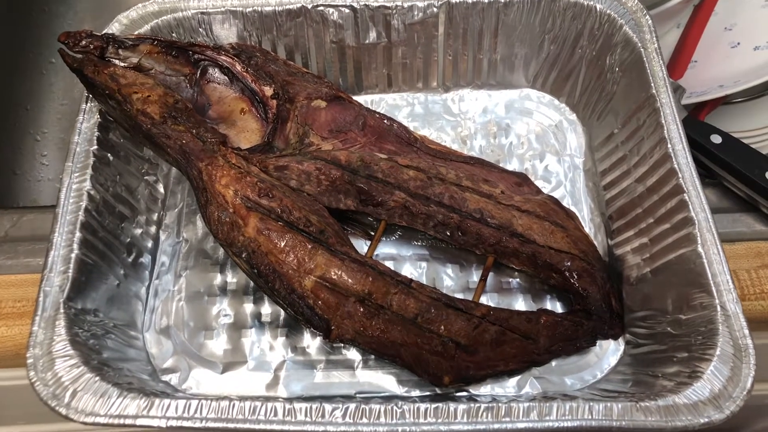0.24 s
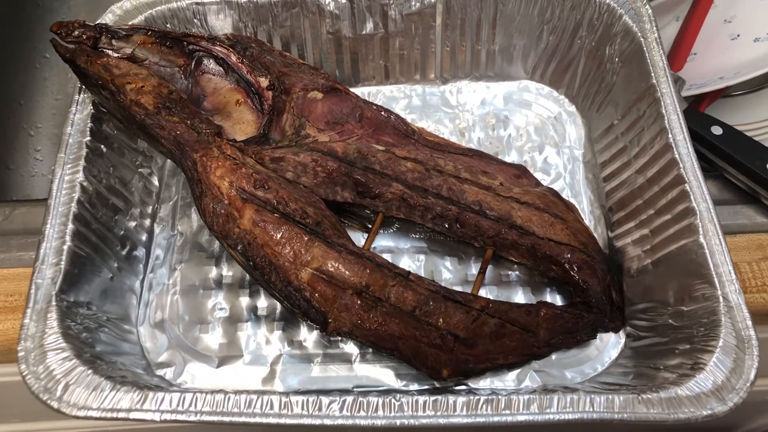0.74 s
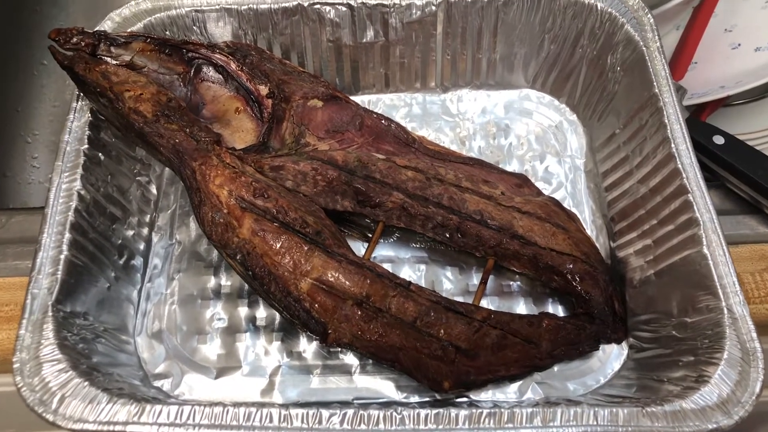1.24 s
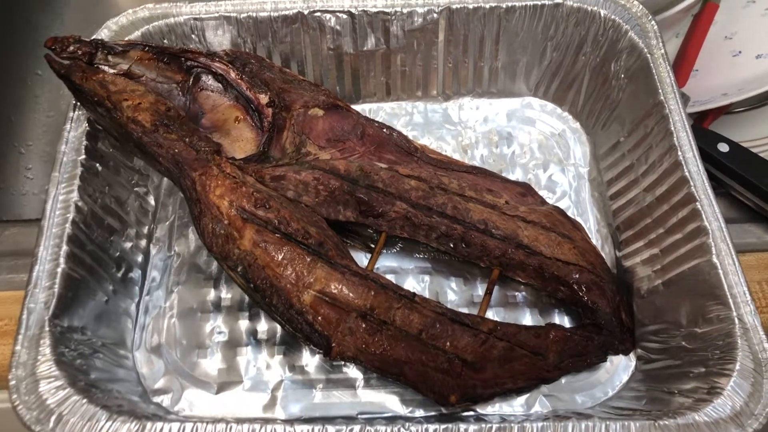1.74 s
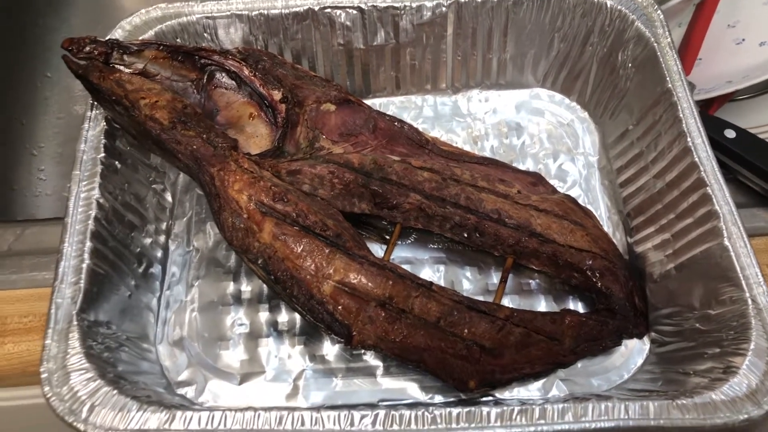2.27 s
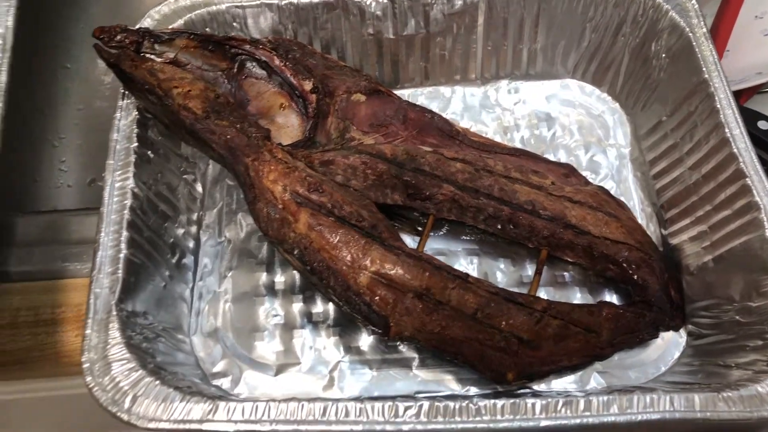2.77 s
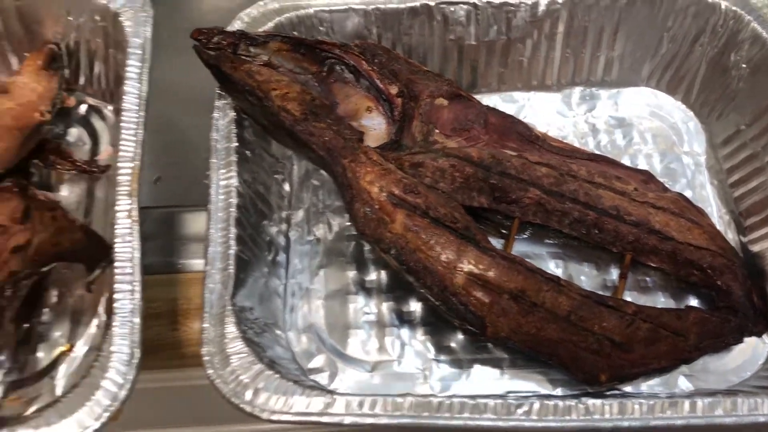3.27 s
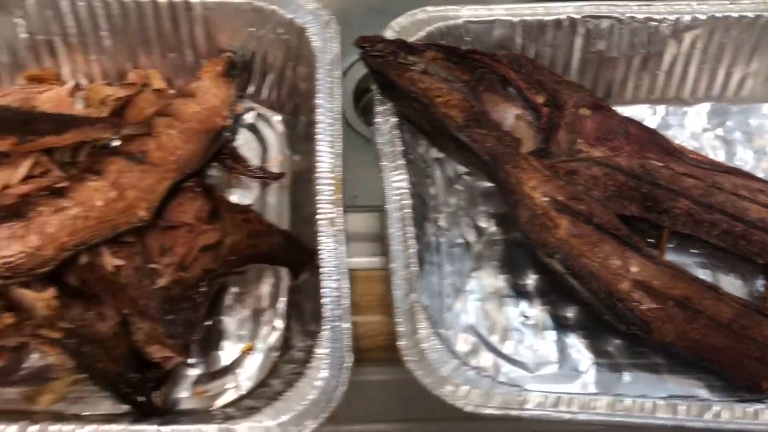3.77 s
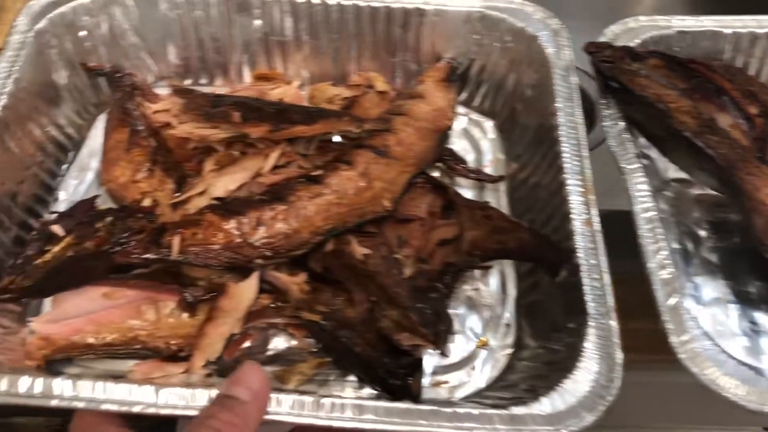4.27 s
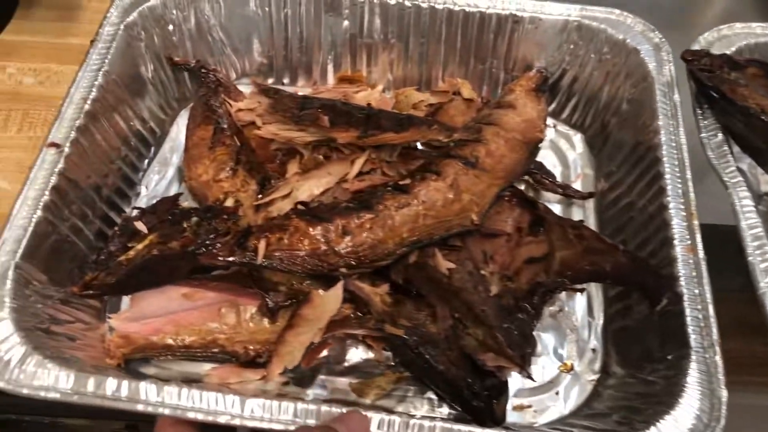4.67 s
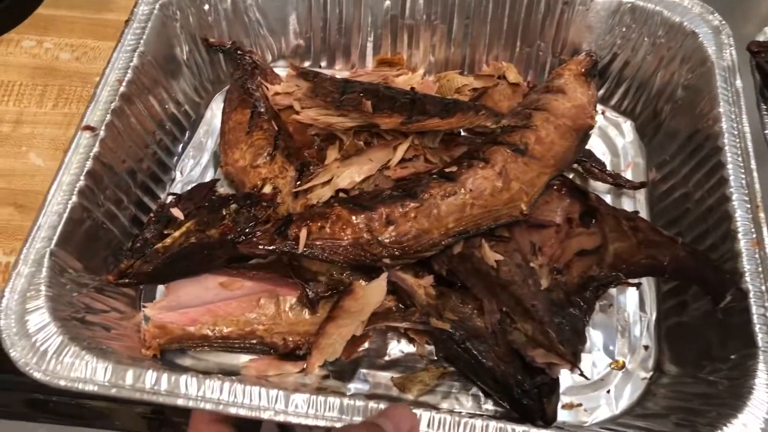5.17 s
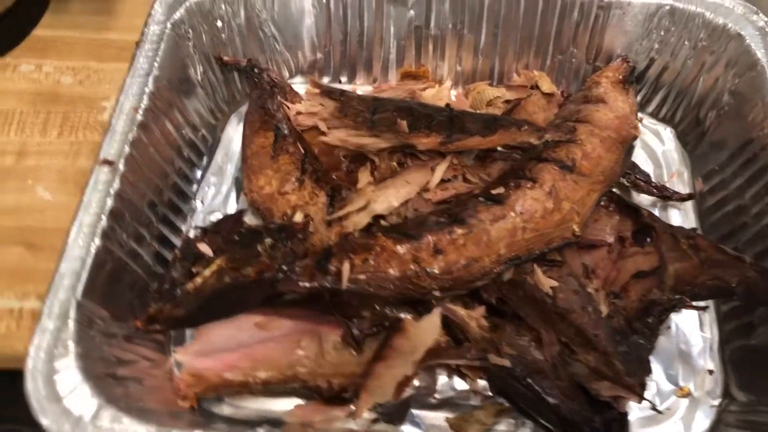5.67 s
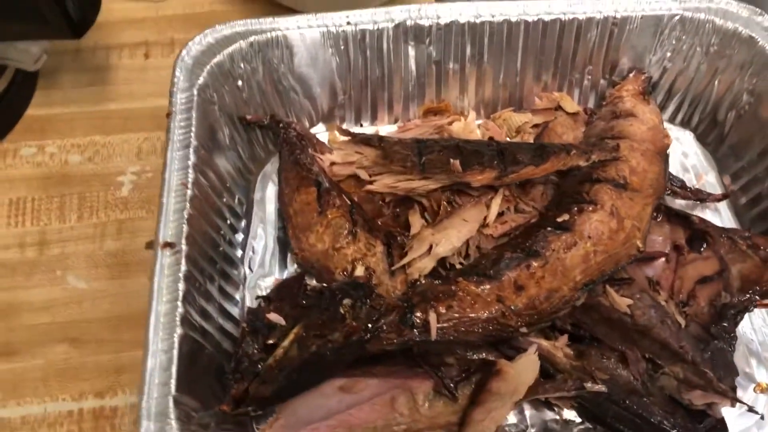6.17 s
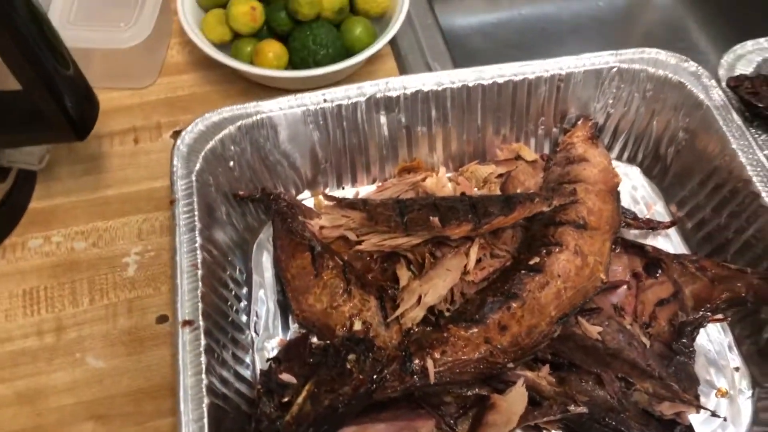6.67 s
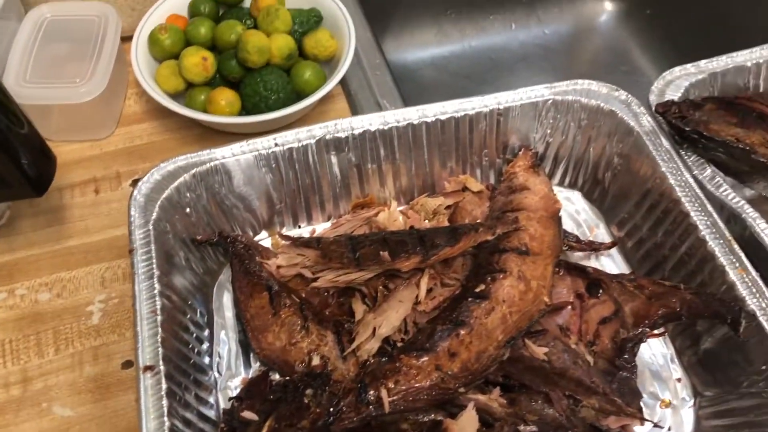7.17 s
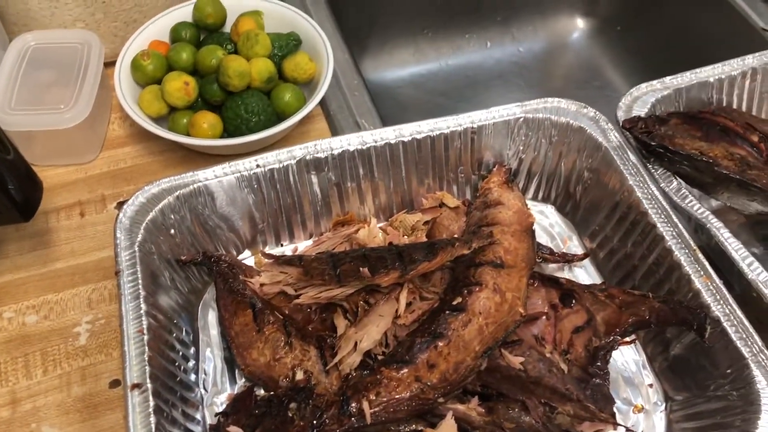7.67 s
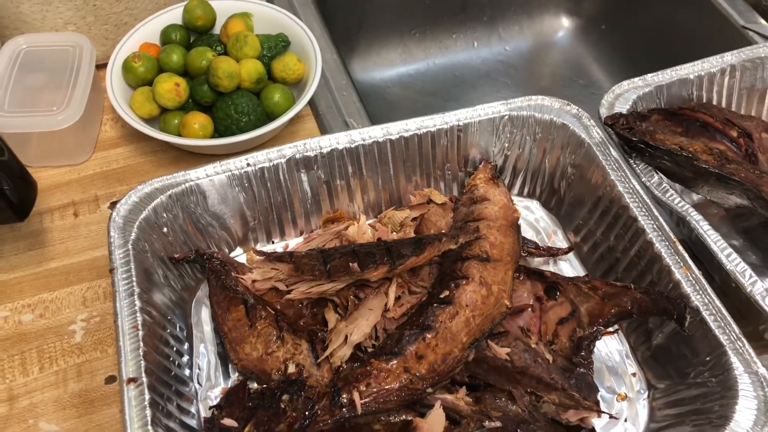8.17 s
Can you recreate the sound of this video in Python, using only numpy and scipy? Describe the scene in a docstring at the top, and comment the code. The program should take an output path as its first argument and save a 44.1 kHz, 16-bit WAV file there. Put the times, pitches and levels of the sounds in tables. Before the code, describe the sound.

A wall clock ticks over quiet fridge hum, then a foil pan scrapes along a counter with loud buckling pops, dull thuds and fading crackles.

```python
"""A wall clock ticks across a kitchen over refrigerator hum, which grows; foil gives a few faint early clicks.
A foil pan of smoked fish is then pushed along the counter: noise slips scrape through resonances of its bottom,
panels buckle as cracks with tone and ring, and the loaded bottom thuds as sinking sines. A second pan is turned
in short, quieter shoves with snaps, crease clicks and a squeak; soft rubs of filtered noise close the scene."""
import sys
import numpy as np
from scipy import signal
from scipy.fft import rfft, irfft, next_fast_len
from scipy.io import wavfile
from scipy.ndimage import uniform_filter1d, map_coordinates

SR = 44100
rng = np.random.default_rng(int(sys.argv[2]) if len(sys.argv) > 2 else 0)


def wrap_up_sound(samples):
    """Save the sound to the file named by the first command line argument, as 16-bit audio."""
    columns = np.atleast_2d(samples).T
    # keep every value between -1 and 1, then stretch to whole-number steps
    tamed = np.clip(columns, -1, 1)
    steps = np.round(tamed * 32767).astype(np.int16)
    wavfile.write(sys.argv[1], SR, steps)


N = 371763
TIME = np.arange(N) / SR
AGE = np.arange(SR // 2) / SR  # s since a blow


def amp(db):
    """Decibels to gain."""
    return 10 ** (np.asarray(db) / 20)


def unit(x):
    """Scale to rms 1."""
    return x / np.sqrt(np.mean(x ** 2) + 1e-20)


def unit_attack(x):
    """Scale a blow so that its first 8 ms have rms 1."""
    return x / np.sqrt(np.mean(x[:SR // 125] ** 2) + 1e-20)


def fade(t60_s):
    """Exponential decay after a blow."""
    return amp(-60 * AGE / t60_s)


def along(points, hz):
    """Interpolate (f/Hz, value) rows on a log frequency axis."""
    f, v = np.transpose(points)
    return np.interp(np.log(hz + 1), np.log(f + 1), v)


def curve(rows):
    """Interpolate (t/s, value) rows, one value per sample."""
    return np.interp(TIME, *np.transpose(rows))


def wobble(knots_per_s):
    """Random curve of straight segments between normal-distributed knots."""
    knots = rng.standard_normal(int(N * knots_per_s / SR) + 4)
    return map_coordinates(knots, [TIME * knots_per_s], order=1)


def coloured(x, gain):
    """Minimum-phase filter with the given gain over frequency, built by folding the cepstrum."""
    m = 2 * next_fast_len(len(x) // 2 + 4096)
    log_gain = np.log(np.maximum(gain(np.fft.rfftfreq(m, 1 / SR)), 1e-6))
    cepstrum = irfft(log_gain, m)
    cepstrum[1:m // 2] *= 2
    cepstrum[m // 2 + 1:] = 0
    return irfft(rfft(x, m) * np.exp(rfft(cepstrum)), m)[:len(x)]


def add(track, s, sound):
    """Mix a sound in at time s."""
    part = track[round(s * SR):][:len(sound)]
    part += sound[:len(part)]


def patchy(x, depth_db):
    """Shifting contact points favour now one band of the foil, now another."""
    z = signal.stft(x, nperseg=512)[2]
    field = uniform_filter1d(rng.standard_normal(z.shape), size=4, axis=0)
    field = uniform_filter1d(field, size=14, axis=1)
    return signal.istft(z * amp(depth_db * unit(field)), nperseg=512)[1][:len(x)]


# Room decay: f/Hz, t60/s
KITCHEN_DECAY = [(150, 0.5), (1000, 0.3), (4000, 0.23), (14000, 0.15)]


def in_kitchen(x, wet_db):
    """Short sound plus a diffuse tail that builds up as the walls answer; highs decay sooner."""
    hz, t, z = signal.stft(rng.standard_normal(len(AGE)), SR, nperseg=256)
    decay = amp(-60 * t / along(KITCHEN_DECAY, hz)[:, None])
    tail = signal.istft(z * decay, SR, nperseg=256)[1][:len(AGE)]
    tail = tail * (1 - fade(0.043))
    return x + amp(wet_db) * signal.fftconvolve(x, tail / np.linalg.norm(tail))[:len(x)]


# Fan rush spectrum: f/Hz, relative level/dB per Hz
RUSH_COLOUR = [(12, -56), (20, -25.5), (46, -9), (113, -3.5), (168, -7), (204, -2.5), (367, -12),
               (399, -14.5), (759, -21), (1030, -20), (1330, -25.5), (2530, -33), (3340, -33.5),
               (4180, -34.5), (16000, -46.5)]
# Refrigerator hum partials: f/Hz, relative level/dB
HUM_PARTIALS = [(59.2, -77.5), (118.4, -68), (199.2, -69)]
# Gain on the whole hum: t/s, level/dB
HUM_GAIN = [(0, -6), (3.5, -6), (4.5, 1.5), (8.4, 3.5)]


def room_tone():
    """Refrigerator hum of unsteady sines; soft fan rush of noise with a faint whistling band."""
    def rush_gain(f):
        whistle = 1 + amp(-7) / (1 + ((f - 1060) / 90) ** 2)
        return amp(along(RUSH_COLOUR, f)) * whistle

    rush = unit(coloured(rng.standard_normal(N), rush_gain))
    hum = np.zeros(N)
    for hz, db in HUM_PARTIALS:
        level = amp(db + 1.3 * wobble(4.4))
        hum += level * np.sqrt(2) * np.sin(2 * np.pi * hz * TIME + 0.71 * wobble(10))
    return amp(-58.5) * rush + amp(curve(HUM_GAIN)) * hum


# Tick spectrum: f/Hz, relative level/dB per Hz
TICK_SPECTRUM = [(500, -29), (950, -2), (1250, 3.5), (1900, -5), (2700, -6.5), (5000, -12), (10000, -22),
                 (16000, -28)]
FIRST_TICK_S, TICK_PERIOD_S = .478, .9958
TICK_DB = -66.5  # rms over 0.5 s, room included


def clock(swell_s=0.032, t60_s=0.153):
    """Each step of the second hand is a brief whirr of gears, blurred by the room."""
    out = np.zeros(N)
    for s in np.arange(FIRST_TICK_S, N / SR, TICK_PERIOD_S):
        rise = np.minimum(AGE / swell_s, 1)
        decay = np.minimum(fade(t60_s) * amp(60 * swell_s / t60_s), 1)  # starts after the swell
        whirr = rng.standard_normal(len(AGE)) * rise * decay
        tick = coloured(whirr, lambda f: amp(along(TICK_SPECTRUM, f)))
        add(out, s, amp(TICK_DB) * unit(in_kitchen(tick, wet_db=-7.5)))
    return out


# Soft rubs of fingers on foil: peak t/s, level/dB, half length/s (to 1/e)
FINGER_RUBS = [(1.472, -64, .012), (5.185, -62, .015), (6.541, -61.5, 0.064), (6.829, -71, .07),
               (7.081, -64, 0.033), (7.31, -70.5, .06), (7.541, -63, 0.031)]
# Rub spectrum: f/Hz, relative level/dB per Hz
RUB_SPECTRUM = [(700, -21), (1500, -3), (2100, -3), (2650, 4), (3400, -9.5), (4500, -4.5), (7000, -15),
                (15000, -27)]


def rubs():
    """Finger pressure swells and fades over patchy friction noise."""
    pressure = sum(amp(db) * np.exp(-((TIME - s) / length_s) ** 2) for s, db, length_s in FINGER_RUBS)
    friction = coloured(rng.standard_normal(N), lambda f: amp(along(RUB_SPECTRUM, f)))
    return pressure * unit(patchy(friction, depth_db=1.0))


# Thin squeaks of rubbed foil: peak t/s, level/dB, half length/s (to 1/e), centre f/Hz
FOIL_SQUEAKS = [(1.002, -65, 0.0072, 3420), (5.9, -74, .085, 4180)]


def squeaks(half_width_hz=300):
    """Fast uneven stick and slip, a narrow band of noise."""
    out = np.zeros(N)
    for s, db, length_s, hz in FOIL_SQUEAKS:
        band = coloured(rng.standard_normal(N), lambda f: 1 / (1 + ((f - hz) / half_width_hz) ** 2))
        out += amp(db) * np.exp(-((TIME - s) / length_s) ** 4) * unit(band)
    return out


GRIP_S, STOP_S = .06, .09  # time to break loose; time to come to rest
SWELL_DB_PER_S, EASE_DB_PER_S = 30, 26  # a slide gathers speed, then slows


def gate(start, end):
    """One between start and end, with soft edges."""
    return np.clip(np.minimum((TIME - start) / GRIP_S, (end - TIME) / STOP_S) + .5, 0, 1)


def sliding(strokes):
    """Loudness of a dragged pan: each stroke breaks loose, swells, eases off and stops."""
    out = np.zeros(N)
    for start, fastest, end, db in strokes:
        drop_db = np.maximum(SWELL_DB_PER_S * (fastest - TIME), EASE_DB_PER_S * (TIME - fastest))
        out += gate(start, end) * amp(db - drop_db)
    return out


# Resonances of the dragged bottom: f/Hz, width/Hz, relative level/dB
BOTTOM_MODES = [(504.5, 45, 1), (1050, 110, -3.5), (1870, 120, -3), (2400, 200, -3.5), (3350, 160, -3.5),
                (4160, 220, -5)]


def scrape(motion, colour, db, modes_db, catches_per_s, catch_db, uneven_db):
    """Foil dragging on the counter: a hiss of tiny slips with coarser catches, through bottom resonances."""
    catches = (rng.random(N) < catches_per_s / SR) * rng.standard_normal(N)
    slips = patchy(rng.standard_normal(N) + amp(catch_db) * unit(catches), depth_db=2.0)

    def gain(f):
        body = 1 + sum(amp(g + modes_db) / (1 + (2 * (f - hz) / width) ** 2)
                       for hz, width, g in BOTTOM_MODES)
        return amp(along(colour, f)) * body

    return motion * amp(db + uneven_db * wobble(35)) * unit(coloured(slips, gain))


# Short shoves of the second pan: start t/s, fastest t/s, end t/s, relative level/dB when fastest
TURN_STROKES = [(3.43, 3.5, 3.6, -61), (3.62, 3.75, 3.82, -57.5), (4.16, 4.33, 4.41, -56.5),
                (4.39, 4.4, 4.46, -63.5), (4.585, 4.6, 4.62, -63), (5.03, 5.24, 5.56, -67.5),
                (5.83, 6.1, 6.15, -67)]
# Its faint rustle in the hand: start t/s, end t/s, relative level/dB
HELD_RUSTLE = (3.15, 6.35, -75)
# Its scrape spectrum: f/Hz, relative level/dB per Hz
TURN_SPECTRUM = [(400, -22), (750, -3), (1300, -5), (2300, -5), (4000, -6.5), (6000, -9), (9000, -12),
                 (12000, -18.5), (16000, -25.5)]


def turned_pan():
    """The second pan scrapes in short shoves over the steady rustle of being held."""
    start, end, held_db = HELD_RUSTLE
    handling = np.hypot(sliding(TURN_STROKES), amp(held_db) * gate(start, end))
    return scrape(handling, TURN_SPECTRUM, db=1.0, modes_db=-2.5, catches_per_s=160, catch_db=-7,
                  uneven_db=0.5)


# First pan slides, is checked by a snap, goes on: start t/s, fastest t/s, end t/s, relative level/dB when fastest
PUSH_STROKES = [(2.16, 2.175, 2.335, -50.5), (2.33, 2.44, 3.09, -43.5)]
# Its scrape spectrum: f/Hz, relative level/dB per Hz
PUSH_SPECTRUM = [(150, -30), (300, -10), (420, -8.5), (500, -3), (620, -14), (950, -9), (1300, -9),
                 (2200, -9), (6300, -12), (16000, -23)]


def pushed_pan():
    """The first pan scrapes along the counter in two strokes."""
    return scrape(sliding(PUSH_STROKES), PUSH_SPECTRUM, db=1, modes_db=1, catches_per_s=350, catch_db=-5.0,
                  uneven_db=1.3)


# Loaded bottom bumping the counter: t/s, relative level/dB, middle f/Hz of the sinking pitch
BOTTOM_BUMPS = [(0.856, -46, 159), (1.538, -46, 260), (2.183, -28, 510), (2.424, -29, 336),
                (2.486, -29.5, 230), (2.508, -23, 198), (2.773, -31.5, 200), (2.848, -32.5, 329),
                (2.991, -41.5, 219), (3.878, -27.5, 164), (3.915, -33.5, 321), (3.989, -38, 161),
                (4.130, -36, 155), (5.203, -44.5, 220)]


def bumps(sag=0.16, t60_s=.078):
    """Soft low thuds whose pitch sinks from 1 + sag to 1 - sag as the bottom relaxes."""
    out = np.zeros(N)
    for s, db, hz in BOTTOM_BUMPS:
        pitch_hz = hz * (1 + sag * (2 * fade(0.089) - 1))
        phase = 2 * np.pi * np.cumsum(pitch_hz) / SR
        thud = np.sin(phase) * fade(t60_s) * (1 - fade(0.023))
        add(out, s, amp(db) * in_kitchen(thud, wet_db=-19.5))
    return out


def dispersed(x, lag_s):
    """Bending waves travel as the root of frequency, so lows arrive late; lag_s is the delay at 1 kHz."""
    khz = np.fft.rfftfreq(2 * len(x), 1 / SR) / 1000
    turns = 2000 * lag_s * np.sqrt(khz)
    return irfft(rfft(x, 2 * len(x)) * np.exp(-2j * np.pi * turns))[:len(x)]


# Ringing of the whole pan: f/Hz, relative level/dB, t60/s
PAN_MODES = [(527.5, -6, .14), (682, -6, .12), (817, -10, .11), (1110, -8, .1), (880, -12, 0.11),
             (995, -4.5, 0.17), (1241, -7, 0.16), (1403, -3.5, .1), (1448, 1.5, 0.13), (1566, 2.5, 0.074),
             (1787, -14, .15), (2330, -3, .11), (2413, -4, 0.092), (2485, -1, 0.077), (2827, -2.5, .09),
             (3220, -0.5, 0.062), (3417, 1, .1), (3710, -3, .09), (5250, -12, 0.16), (6600, -9, 0.15)]
TONE_DB, TONE_DB_PER_OCTAVE = -2, -3.5  # panel tone at 1 kHz top edge; brighter cracks carry less
RING_DB, HARD_DB, RING_DB_PER_DB = -21, -22, 1.75  # ring in light snaps; it grows above HARD_DB


def snap(db, low_hz, top_hz, fall_db, pitch_hz, shiver_db):
    """Foil buckles: a crack, a shiver of countless modes, the panel's own tone and the ring of the pan."""
    tone_db = TONE_DB + TONE_DB_PER_OCTAVE * np.log2(top_hz / 1000)
    ring_db = RING_DB + RING_DB_PER_DB * max(db - HARD_DB, 0)

    def band(hz):
        # wide, slack panels give low, dull pops; tight creases give bright cracks
        low_cut = (1 + (low_hz / (hz + 1)) ** 5) ** -.5
        return low_cut * amp(-fall_db * np.log2(1 + (hz / top_hz) ** 4) / 4)

    shape = (fade(0.018) + amp(shiver_db) * fade(.1)) * (1 - fade(0.0026))
    crack = coloured(rng.standard_normal(len(AGE)) * shape, band)
    crack = unit_attack(dispersed(crack, lag_s=.0012))

    tone_shape = (fade(0.017) + amp(shiver_db - 5) * fade(0.055)) * (1 - fade(0.011))
    tone = unit_attack(np.sin(2 * np.pi * pitch_hz * AGE) * tone_shape)

    ring = np.zeros(len(AGE))
    for hz, level_db, t60_s in PAN_MODES:
        level = amp(level_db + rng.normal(0, 1.5))
        ring += level * np.sin(2 * np.pi * (hz * AGE + rng.random())) * fade(t60_s)
    ring = unit_attack(ring * (1 - fade(0.015)))

    blow = unit_attack(crack + amp(tone_db) * tone + amp(ring_db) * ring)
    return amp(db) * in_kitchen(blow, wet_db=-14.5)


# Foil panels flipping: t/s, level/dB, low edge f/Hz, top edge f/Hz, fall above it/dB per octave,
# panel tone f/Hz, shiver level/dB
PANEL_SNAPS = [(0.8531, -47.5, 300, 1500, 24, 755, -34), (1.487, -58, 300, 1000, 13, 597, -4),
               (1.537, -53, 300, 900, 22, 540, -24), (2.1735, -12.5, 540, 3700, 11, 2760, -6),
               (2.4153, -27, 280, 1995, 10.5, 915, 10), (2.5033, -24.5, 173, 1270, 14.5, 1226, -1),
               (2.7352, -25, 700, 2460, 15.5, 1415, -4), (2.8411, -30.5, 300, 1400, 12, 560, -14),
               (2.9859, -29.5, 190, 1656, 22.5, 1112, -11.5), (3.794, -43, 280, 3000, 11.5, 516, -12.5),
               (3.874, -41, 250, 7500, 23, 1060, -17), (3.9096, -20.5, 230, 5700, 23, 1010, -18),
               (4.130, -53.5, 300, 1090, 8.5, 710, -1), (5.058, -45, 350, 2160, 8.5, 789, -6),
               (5.2015, -47.5, 300, 4600, 8.5, 635, -13), (5.563, -53.5, 900, 2300, 13.5, 1440, 0),
               (5.986, -51, 2000, 7040, 15, 3950, -9.5)]
# Tight creases ticking: t/s, level/dB
CREASE_CLICKS = [(3.6712, -47.5), (3.734, -53), (3.840, -61), (4.694, -65), (4.783, -62.5), (4.873, -65.5),
                 (5.327, -63.5), (7.3658, -61)]
# Their shared voice: low edge f/Hz, top edge f/Hz, fall/dB per octave, tone f/Hz, shiver level/dB
CREASE_VOICE = (800, 7500, 11.5, 4400, -7)


def snaps():
    """Every buckling panel has its own voice; the small creases share one."""
    out = np.zeros(N)
    for s, db, *panel in PANEL_SNAPS:
        add(out, s, snap(db, *panel))
    for s, db in CREASE_CLICKS:
        add(out, s, snap(db, *CREASE_VOICE))
    return out


def scene():
    """Sum of the room, the clock and both pans, as one channel."""
    background = room_tone() + clock()
    handling = rubs() + squeaks() + turned_pan()
    return (background + handling + pushed_pan() + bumps() + snaps())[None]


TOP_HZ = 15900


def record(dry):
    """The microphone rounds off the highest peaks; nothing is kept above the band limit."""
    rounded = dry / (1 + (dry / .9) ** 8) ** (1 / 8)
    m = next_fast_len(N + SR // 2)
    return irfft(rfft(rounded, m) * (np.fft.rfftfreq(m, 1 / SR) < TOP_HZ), m)[..., :N]


dry = scene()
out = record(dry)
wrap_up_sound(out)
```